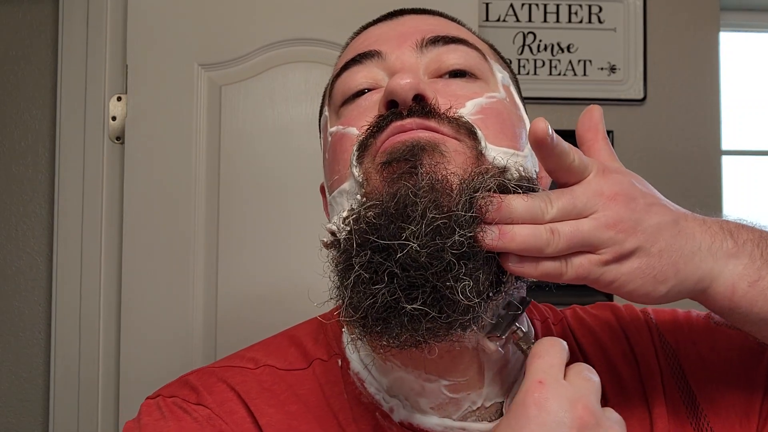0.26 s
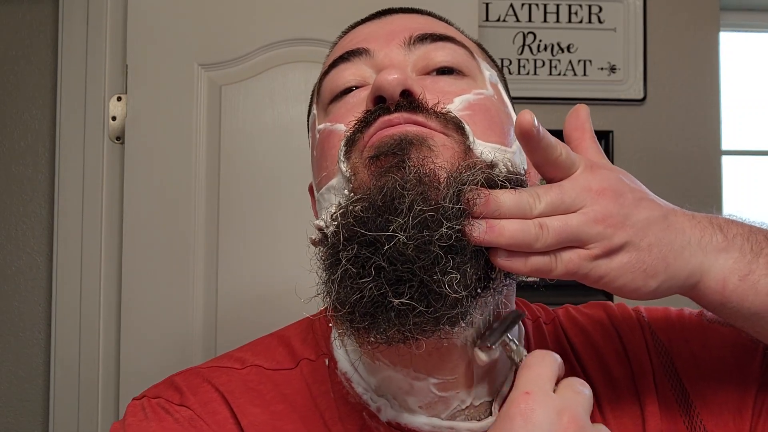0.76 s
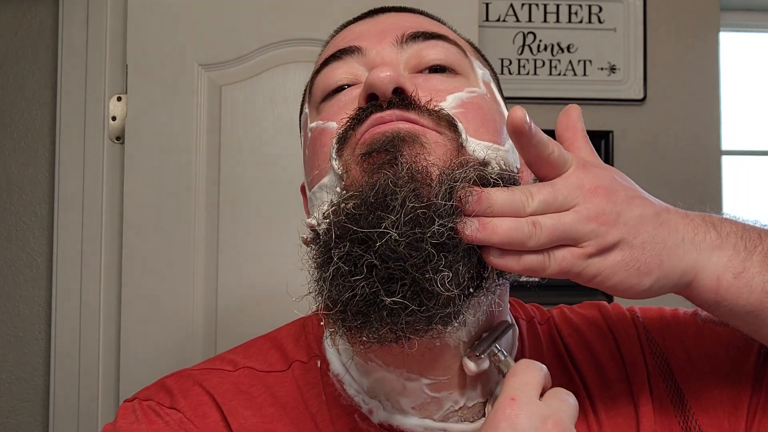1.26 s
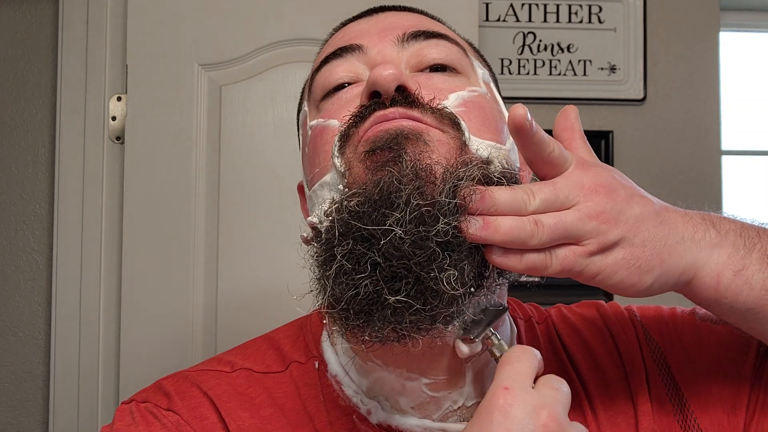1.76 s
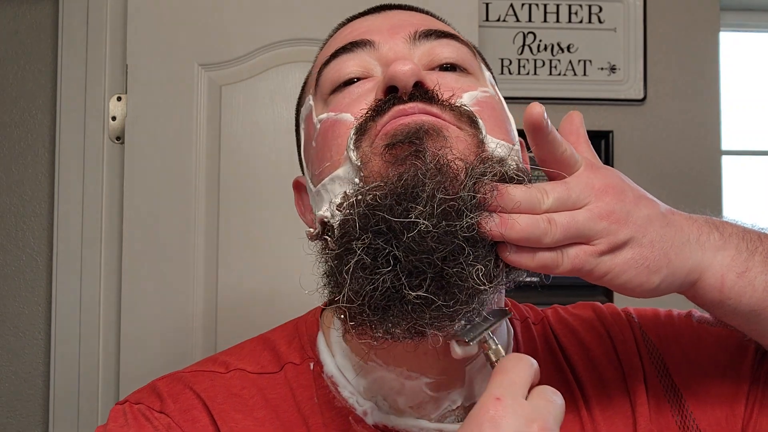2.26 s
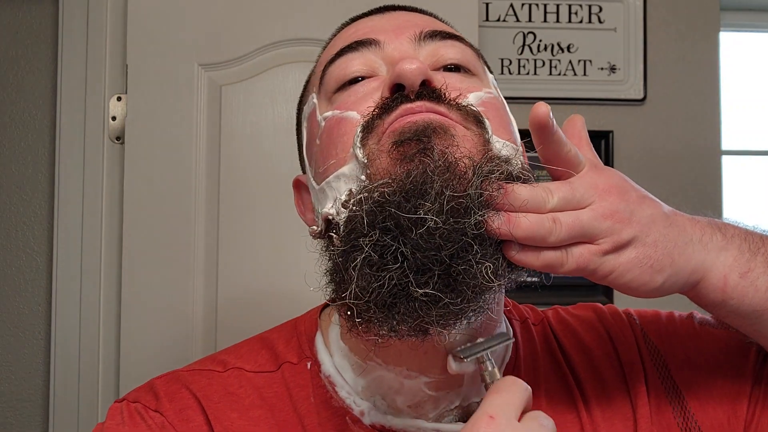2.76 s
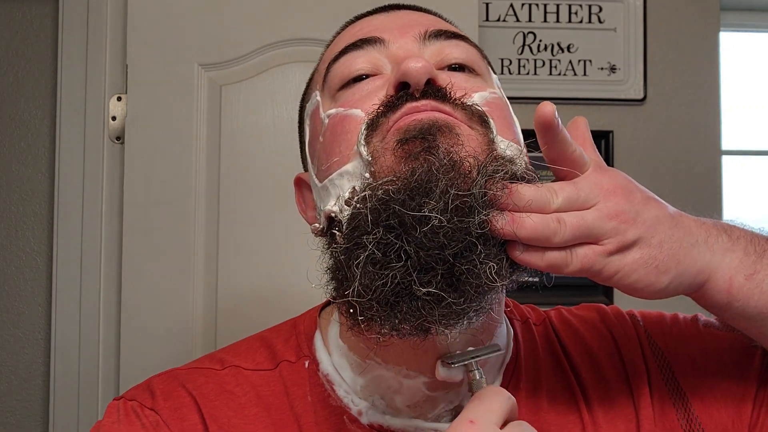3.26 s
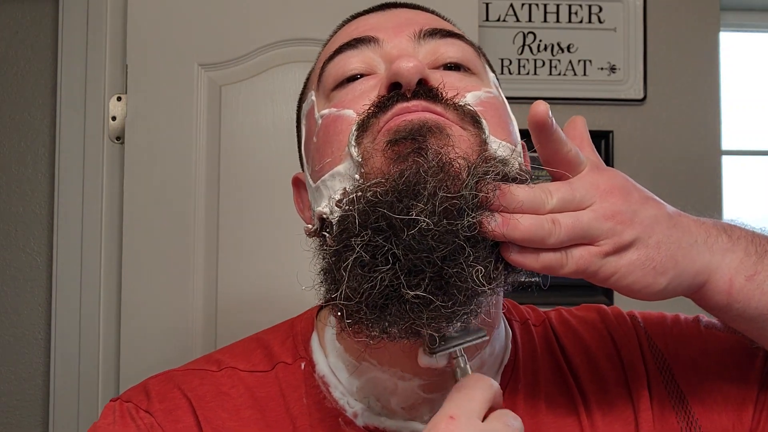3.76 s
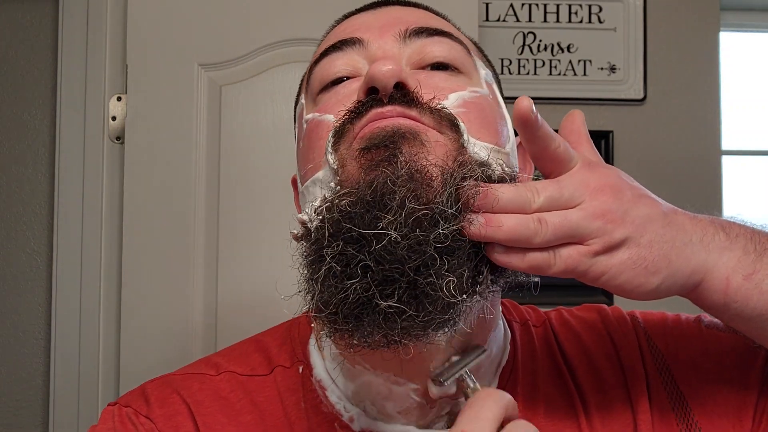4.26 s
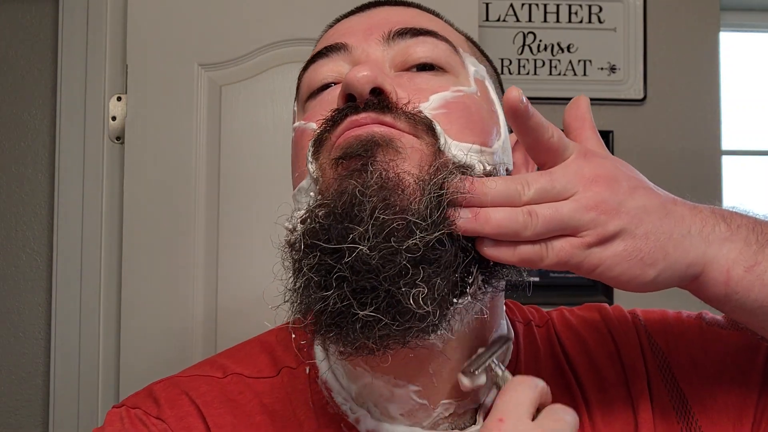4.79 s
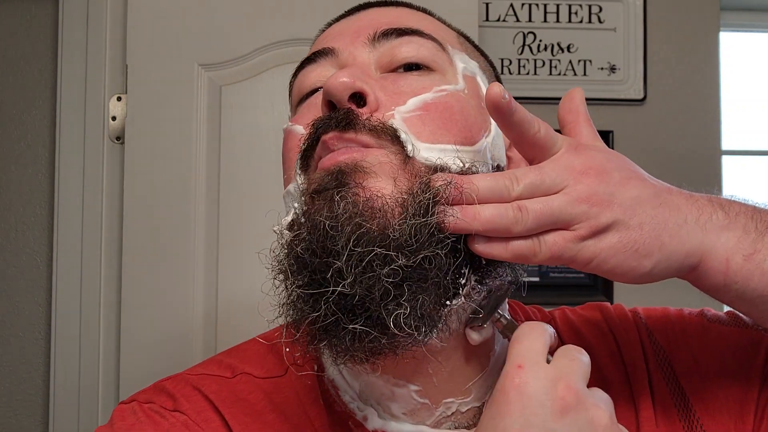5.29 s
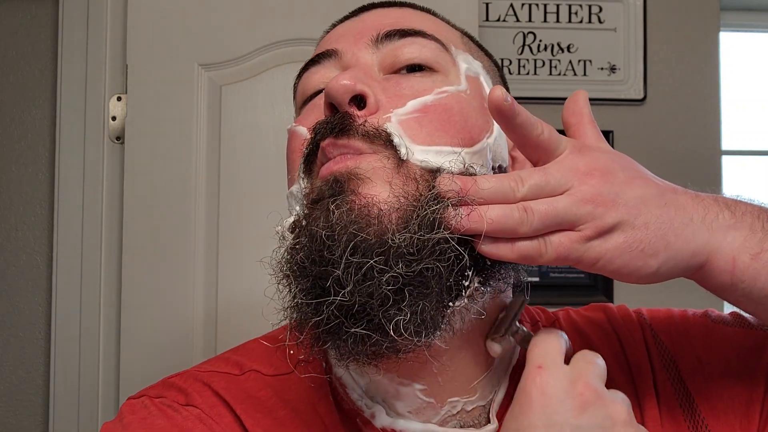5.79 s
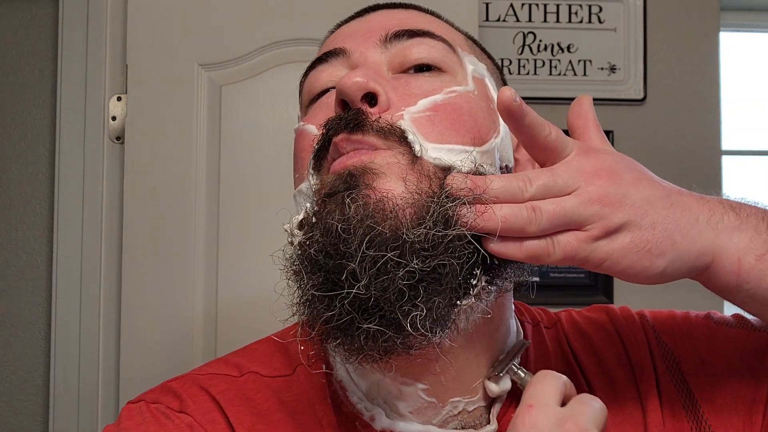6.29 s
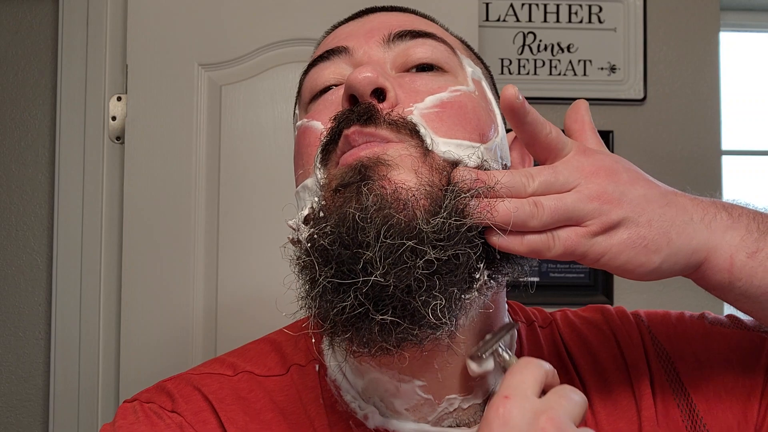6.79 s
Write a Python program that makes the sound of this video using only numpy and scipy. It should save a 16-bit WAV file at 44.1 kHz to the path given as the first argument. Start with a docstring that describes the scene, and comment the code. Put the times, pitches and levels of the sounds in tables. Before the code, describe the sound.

Short, crisp razor scrapes follow each other quickly and evenly, then slow to fewer than three a second. They are bright, dry and grainy, with bristles twanging, thick hairs clicking and wet lather crackling at the edges. The blade occasionally sings for an instant. Behind it lies a constant low electrical and fan hum with airy rumble and very faint hiss. Close stereo pickup in a small room with a short hard reflection.

```python
"""Wet shave with a safety razor

A razor is drawn over a lathered neck in short strokes, about three a second, then slower, in a small bathroom.
The edge rasps and at times sings on the skin; cut stubble rings the razor head; wiped lather crackles.
Rasp, stubble and lather are random clicks, shaped per stroke and filtered; hairs and landings are plucks.
Behind it lie mains and fan tones, a fan throb and filtered noise for ventilation rumble and hiss.
Two phone microphones an arm's length away hear the razor with differing lag, wall ring and colour."""
import sys
import numpy as np
from scipy import signal
from scipy.fft import rfft, irfft
from scipy.io import wavfile
from scipy.ndimage import uniform_filter1d, map_coordinates

SR = 44100
rng = np.random.default_rng(int(sys.argv[2]) if len(sys.argv) > 2 else 0)


def generate_wav(sig):
    """Save sig (samples, or channels by samples) to the path in sys.argv[1] as 16-bit PCM at SR."""
    pcm = np.round(np.clip(np.atleast_2d(sig).T, -1, 1) * 32767).astype(np.int16)
    wavfile.write(sys.argv[1], SR, pcm)


N = 310464
TIME = np.arange(N) / SR
FREQS = np.arange(N // 2 + 1) * SR / N

# razor strokes: start_s, length_s, hardest_bite (share of length), most_lather (share of length),
# rasp_db, stubble_db, lather_db, landing_tick_db
STROKES = [ (0.075, 0.11, 0.35, 0.87, -84, -66.5, -74.5, -37.5),
           (0.371, .11, 0.76, 0.89, -79, -69, -74.5, -43.5),
           (0.669, 0.13, 0.29, 0.65, -82, -67.5, -69, -42.5),
           (0.983, 0.15, .52, 0.43, -80, -73.5, -77, -48),
           (1.272, .115, 0.72, 0.68, -79, -71.5, -74.5, -42),
           (1.572, 0.072, 0.14, 0.66, -77, -65, -72, -52), (1.865, .122, 0.57, 0.059, -76, -70, -73.5, -50),
           (2.135, .15, 0.33, 0.66, -77, -67, -70.5, -40.5), (2.457, 0.12, .05, .05, -75, -73, -77, -32),
           (2.727, .125, .3, .52, -73, -74.5, -79, -48), (3.021, 0.092, 0.18, 0.5, -74, -78, -80, -53),
           (3.305, 0.086, .35, 0.9, -73, -71, -78, -51), (3.576, 0.095, 0.12, 0.64, -75, -67, -79, -43),
           (3.878, 0.2, 0.099, 0.37, -70, -72.5, -74, -44), (4.3175, 0.12, 0.68, 0.7, -75, -75, -71.5, -44),
           (4.735, 0.1, .45, .42, -74.5, -74.5, -70.5, -64),
           (5.115, 0.091, 0.55, 0.24, -75, -68.5, -73, -61), (5.467, 0.15, 0.66, 0.1, -74, -70, -76.5, -55),
           (5.858, 0.18, .1, .05, -78, -73, -83, -50), (6.279, 0.14, 0.77, 0.47, -71.5, -73, -79, -62),
           (6.691, 0.1, 0.53, 0.25, -71, -73.5, -78, -64)]


def undb(db):
    """Decibels to gain."""
    return 10 ** (np.asarray(db) / 20)


def unit(x):
    """Scale to rms 1."""
    return x / np.sqrt(np.mean(np.abs(x) ** 2))


def slope(points):
    """Join (Hz, dB) points on a log-frequency axis."""
    hz, db = np.transpose(points)
    return np.interp(np.log(FREQS + 1), np.log(hz), db)


def response(points):
    """Causal minimum-phase filter with the given colour, falling steeply outside its points."""
    below = np.maximum(points[0][0] / (FREQS + 1), 1)
    above = np.maximum(FREQS / points[-1][0], 1)
    gain = undb(slope(points)) / (below * above) ** 4 + 1e-5
    cepstrum = irfft(np.log(gain), N)
    # fold the cepstrum onto positive time
    cepstrum[1:N // 2] *= 2
    cepstrum[N // 2 + 1:] = 0
    return np.exp(rfft(cepstrum))


def through(x, gain):
    """Filter by a frequency response."""
    return irfft(rfft(x) * gain, N)


def walk(steps_per_s):
    """Random wandering of rms about 1: random steps joined by straight lines."""
    step = int(SR / steps_per_s)
    held = np.repeat(rng.standard_normal(N // step + 1), step)
    return unit(uniform_filter1d(held, step))[:N]


def crackle(per_s, spread_db):
    """Tiny clicks at random moments, most small and a few large; rms 1."""
    present = rng.random(N) < per_s / SR
    size = np.minimum(rng.exponential(size=N), 4)
    sign = rng.choice([-1, 1], N)
    return unit(present * sign * undb(spread_db * size))


def pair(likeness):
    """Left and right noise, alike by the given share at each frequency, as spectra."""
    mid, side = rfft(rng.standard_normal((2, N)))
    shared = np.sqrt((1 + likeness) / 2) * mid
    opposed = np.sqrt((1 - likeness) / 2) * side
    return shared + opposed * np.array([[1], [-1]])


def hum(steps_per_s):
    """Mains and fan tones, each wavering in level and phase."""
    # steady tones: pitch_hz, rms_db, waver (share of level)
    hum_tones = [(81.1, -65, .8), (98.4, -54, .3), (120, -47.3, .04), (234.3, -75, .2), (240, -66.8, .3),
                 (360, -76, .1), (436, -88, .5), (960, -101, .4)]
    out = 0
    for hz, db, waver in hum_tones:
        phase = 2 * np.pi * (hz * TIME + rng.random())
        wobble = walk(steps_per_s) * np.sin(phase) + walk(steps_per_s) * np.cos(phase)
        out = out + undb(db) * unit(np.sin(phase) + waver * wobble)
    return out


def fan_throb(hz, width_hz, db, sharpness):
    """Once a turn the fan rubs softly and stirs a low resonance: noise in a narrow band, swelling per turn."""
    turns_per_s = 2.986
    rub = np.exp(sharpness * (np.cos(2 * np.pi * turns_per_s * TIME) - 1))
    resonance = 1 / (1 + 2j * (FREQS - hz) / width_hz) ** 2
    drone = through(rng.standard_normal(N), resonance)
    return undb(db) * unit(rub * drone)


def air(rumble_db, hiss_db, alike_hz, eddy_hz, hiss_likeness):
    """Fan rumble and hiss. Long waves reach both microphones alike; the slowest eddies do not."""
    # colour of the ventilation rumble: freq_hz, level_db
    rumble_colour = [(14, -21.5), (20, 1.5), (35, -2), (65, -1.5), (85, 3), (108, -6.5), (155, -5.5),
                     (190, -18.5), (250, -15.5), (295, -27), (345, -20), (380, -29), (470, -28.5),
                     (560, -33), (800, -42.5)]
    # colour of the hiss above it: freq_hz, level_db
    hiss_colour = [(410, -31), (700, 1.5), (873, -9.5), (995, -3), (1130, -8), (1430, -8), (1720, -10),
                   (2090, -6.5), (2510, -9.5), (4160, -8.5), (4990, -4.5), (6650, -14.5), (7480, -10.5),
                   (9450, -31), (15700, -27)]
    # level of the deepest rumble: time_s, gain_db
    deep_levels = [(0, 0.5), (0.5, -2), (0.7, 0.5), (1.15, 6), (1.4, -3), (3.1, 2.5), (3.45, 6), (3.7, 1.5),
                   (4.4, -2.5), (4.75, 4), (5.05, 0), (6.05, 3), (6.4, 1), (7.04, -3.5)]
    likeness = 1 / (1 + (FREQS / alike_hz) ** 3) / (1 + (eddy_hz / (FREQS + 1)) ** 3)
    rumble = unit(irfft(pair(likeness) * response(rumble_colour), N))
    hiss = unit(irfft(pair(hiss_likeness) * response(hiss_colour), N))
    # only the deepest part rises and falls
    deep = through(rumble, 1 / (1 + (FREQS / 80) ** 4))
    deep_gain = undb(np.interp(TIME, *np.transpose(deep_levels)))
    rumble = rumble + deep * (deep_gain - 1)
    return rumble * undb(rumble_db) + hiss * undb(hiss_db)


def chirps(waver_hz):
    """The edge catches on taut skin and sings: swells of a nearly pure tone, its pitch trembling as it slips."""
    # singing of the edge: centre_s, pitch_hz, level_db, half_length_s
    chirp_list = [(0.44, 2180, -71, 0.012), (1.586, 2330, -65, 0.01), (3.899, 4970, -69, .009),
                  (3.936, 2470, -70, 0.021), (4.033, 2300, -77, .02), (4.774, 2974, -71.5, .018),
                  (5.145, 3080, -72.5, 0.016), (6.372, 2263, -65.5, 0.02), (6.764, 2290, -74, .02)]
    out = np.zeros(N)
    tremble = 2 * np.pi * np.cumsum(waver_hz * walk(400)) / SR
    for s, hz, db, half_s in chirp_list:
        on = np.abs(TIME - s) < 3 * half_s
        envelope = np.exp(-((TIME[on] - s) / half_s) ** 2)
        out[on] += undb(db) * envelope * np.sin(2 * np.pi * hz * TIME[on] + tremble[on])
    return np.sqrt(2) * out


def tufts(width_hz, per_s):
    """Tufts of long, stiff bristles twang off the blade: runs of plucks, each ringing briefly at their pitch."""
    # twanging tufts: centre_s, pitch_hz, level_db, half_length_s
    tuft_list = [(0.11, 4470, -66.5, .032), (0.411, 4300, -63.5, .028), (0.705, 4170, -72, 0.018),
                 (1.287, 4600, -65.5, .014), (1.574, 4500, -69.5, .012), (2.141, 5000, -69, 0.013),
                 (2.456, 4900, -62.5, 0.0091), (3.892, 4900, -67, 0.0091), (5.646, 5000, -71, 0.011),
                 (6.349, 5000, -72.5, .018), (6.74, 4960, -69, .006)]
    out = np.zeros(N)
    plucks = crackle(per_s, spread_db=3.5)
    age = TIME[:SR // 100]
    for s, hz, db, half_s in tuft_list:
        on = np.abs(TIME - s) < 3 * half_s
        ring = age * np.exp(-np.pi * width_hz * age) * np.sin(2 * np.pi * hz * age)
        run = plucks[on] * np.exp(-((TIME[on] - s) / half_s) ** 2)
        out[on] += undb(db) * signal.lfilter(ring / np.linalg.norm(ring), 1, run)
    return out


def razor_head(ring_db):
    """Each impulse passes straight on and also rings the modes of the metal head."""
    # modes of the head: freq_hz, width_hz, relative_db
    head_modes = [(1550, 84, 0), (2140, 110, -10.5), (2530, 38, -31), (3110, 57, -11), (3440, 130, -2),
                  (4710, 6.7, -0.5), (5180, 22, -7.5), (4930, 15, -5.5), (6060, 140, 2), (6960, 73, -7)]
    ring = sum(undb(db + ring_db) / (1 + 2j * (FREQS - hz) / width) for hz, width, db in head_modes)
    return 1 + ring


def swell(age_s, length_s, peak, drops_db):
    """Grow to a peak at the given share of the stroke, ease off, then die quickly as the blade lifts."""
    lift_db_per_s = 481
    first_db, last_db = drops_db
    db = np.interp(age_s / length_s, [0, np.clip(peak, .01, .99), 1], [-first_db, 0, -last_db])
    return undb(db - lift_db_per_s * np.maximum(age_s - length_s, 0))


def stroke_levels():
    """Cutting peaks at the bite, crackle where the lather piles up, the rasp of the skin midway between."""
    firm_land_s, firm_tick_db = 0.0022, -42.5  # softer ticks land slower in proportion, louder ones faster
    # below the peak: as the blade lands dB, as it lifts dB
    rasp_drops_db, stubble_drops_db, lather_drops_db = (7.6, 9), (4, 12.2), (14, 10)
    rasp, stubble, lather = levels = np.zeros((3, N))
    for s, length_s, bite, piled, rasp_db, stubble_db, lather_db, tick_db in STROKES:
        land_s = firm_land_s * undb(firm_tick_db - tick_db)
        on = slice(max(int((s - land_s) * SR), 0), int((s + 2 * length_s) * SR))
        age_s = TIME[on] - s
        contact = np.clip(age_s / land_s + 1, 0, 1)
        rasp[on] += contact * undb(rasp_db) * swell(age_s, length_s, (bite + piled) / 2, rasp_drops_db)
        stubble[on] += contact * undb(stubble_db) * swell(age_s, length_s, bite, stubble_drops_db)
        lather[on] += contact * undb(lather_db) * swell(age_s, length_s, piled, lather_drops_db)
    return levels


def snaps(burst_s, chatter):
    """Each landing and thick hair is a sharp pluck with brief blade chatter; returns dry and wet parts."""
    # thick hairs snapping under the lather: time_s, dry_snap_db, wet_crackle_db
    thick_hairs = [(0.15, -36.5, -60), (0.3865, -44, -65), (0.404, -41, -66), (0.4653, -51, -45),
                   (0.727, -43, -42), (1.0624, -47, -48), (1.1066, -48, -42.5), (1.287, -41, -64),
                   (1.3812, -53, -43.5), (1.5883, -33.5, -62), (1.627, -53, -45.5), (1.7075, -54, -48),
                   (2.152, -37, -58), (2.462, -35, -41), (2.5326, -44, -41), (3.3874, -50, -51),
                   (3.6128, -48, -58), (3.7309, -62, -59), (3.9539, -46, -54), (4.0432, -44, -48),
                   (4.3645, -39.5, -46), (4.3789, -36, -39), (4.7598, -46, -43), (4.779, -44, -45),
                   (4.8685, -46, -49), (5.1277, -49, -41), (5.141, -49, -44), (5.6421, -45.5, -57),
                   (5.9945, -43.5, -66), (6.743, -45, -43.5)]
    landing_wet_db = -15.5  # lather squashed by the landing blade, relative to its tick
    landings = [(s, tick_db, tick_db + landing_wet_db) for s, *_, tick_db in STROKES]
    plucks = landings + list(thick_hairs)
    dry_part, wet_part = np.zeros((2, N))
    age = TIME[:SR // 100]
    noises = rng.standard_normal((len(plucks), len(age)))
    for (s, dry_db, wet_db), noise in zip(plucks, noises):
        burst = chatter * noise * np.exp(-age / burst_s)
        burst[0] += 1
        burst /= np.linalg.norm(burst)
        at = int(s * SR)
        dry_part[at:at + len(age)] += burst * undb(dry_db)
        wet_part[at:at + len(age)] += burst * undb(wet_db)
    return dry_part, wet_part


def razor():
    """Dense slips on the skin, sparser cuts of hair and bursting foam, all heard through the razor head."""
    # colour of the rasp on the skin: freq_hz, level_db
    rasp_colour = [(1100, -8), (1500, -7), (1800, -7), (2250, -2), (2700, -2.5), (3100, 0.5), (3700, -8.5),
                   (4200, -16)]
    # colour of the stubble cutting: freq_hz, level_db
    stubble_colour = [(1750, -15), (2150, -1.5), (3100, -0.5), (3700, -8), (4400, -3), (5000, -0.5),
                      (5500, -2.5), (6000, -19), (6700, -11), (7400, -6.5), (8300, -11.5), (9600, -26.5)]
    # colour of the lather crackle: freq_hz, level_db
    lather_colour = [(6600, -7.5), (7500, 0.0), (8600, -6), (9900, -10), (11300, -7), (12700, -4),
                     (14000, -6), (15400, -4.5)]
    rasp, cutting, foam = stroke_levels()
    dry_snaps, wet_snaps = snaps(burst_s=.0005, chatter=.25)
    head = razor_head(ring_db=-1)

    patches_per_s, patchy_db = 90, 2.5  # stubble grows unevenly
    patches = unit(undb(patchy_db * walk(patches_per_s)))
    slips = rasp * crackle(per_s=1600, spread_db=2.5)
    cuts = cutting * patches * crackle(per_s=1100, spread_db=4) + dry_snaps
    bubbles = foam * patches * crackle(per_s=1400, spread_db=5) + wet_snaps

    scrape = np.zeros(N)
    for push, colour in [(slips, rasp_colour), (cuts, stubble_colour), (bubbles, lather_colour)]:
        scrape += through(push, unit(head * response(colour)))
    return scrape + tufts(width_hz=1300, per_s=1800) + chirps(waver_hz=45.1)


def bathroom(x, wall_db, t60_s, sways_per_s, count=4):
    """Direct sound reaches the left microphone first; its lag and the wall ring shift as the hand moves."""
    port_lag_samples = 7
    age = TIME[:SR // 3]
    walls = rng.standard_normal((count, 2, len(age))) * np.exp(-np.log(1000) * age / t60_s)
    walls *= undb(wall_db) / np.linalg.norm(walls, axis=2, keepdims=True)
    # wandering mix of several wall responses, constant in power
    shares = np.array([walk(sways_per_s) for _ in range(count)])
    shares /= np.linalg.norm(shares, axis=0)
    ring = np.zeros((2, N))
    for share, wall in zip(shares, walls):
        ring += signal.oaconvolve((x * share)[None], wall, axes=1)[:, :N]
    lag = port_lag_samples + walk(2 * sways_per_s)
    right = map_coordinates(x, [np.arange(N) - lag], order=3)
    direct = np.array([x, right])
    return (direct + ring) / np.sqrt(1 + undb(wall_db) ** 2)


def scene():
    """The razor in the bathroom over hum, fan and air."""
    shave = bathroom(razor(), wall_db=-2.5, t60_s=.21, sways_per_s=5)
    fan = fan_throb(hz=331.7, width_hz=30, db=-77.0, sharpness=1.8)
    vent = air(rumble_db=-51.0, hiss_db=-77, alike_hz=514, eddy_hz=23, hiss_likeness=0.046)
    return shave + hum(steps_per_s=7) + fan + vent


def record(dry):
    """The two microphone ports colour the sound differently; the ends are eased and the top is cut off."""
    # left minus right microphone, low range: freq_hz, difference_db
    ports_low = [(120, .3), (280, .5)]
    # left minus right microphone, upper range: freq_hz, difference_db
    ports_high = [(550, 7), (1000, 3), (2200, 7), (3600, 2.5), (5400, 5.5), (6050, 10), (7200, 11.5),
                  (8600, 11), (10000, 1.5), (12500, 5.5), (15400, 7)]
    top_hz = 15750
    eased = dry * signal.windows.tukey(N, .003)
    difference_db = slope([*ports_low, *ports_high])
    heard = through(eased, undb(difference_db * np.array([[1], [-1]]) / 2))
    top_cut = signal.ellip(10, .2, 70, top_hz, fs=SR, output="sos")
    return signal.sosfilt(top_cut, heard)


dry = scene()
out = record(dry)
generate_wav(out)
```